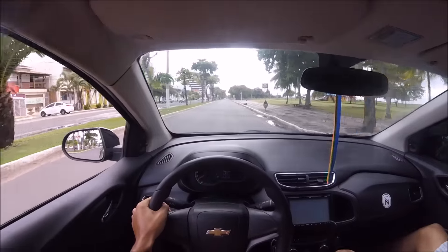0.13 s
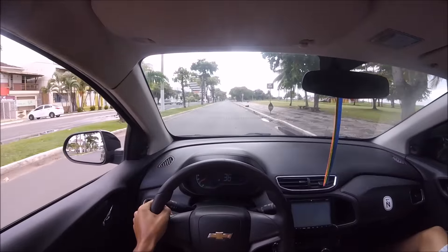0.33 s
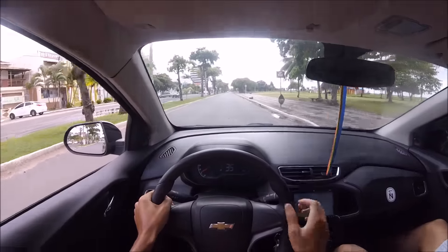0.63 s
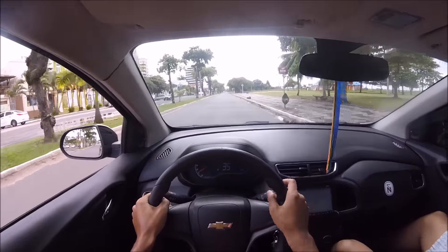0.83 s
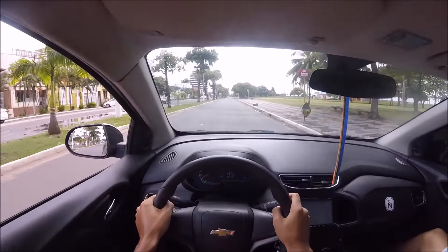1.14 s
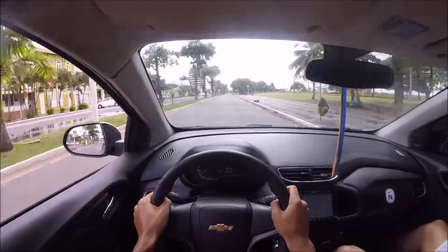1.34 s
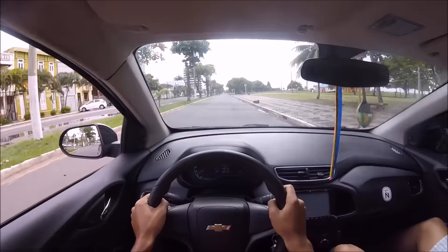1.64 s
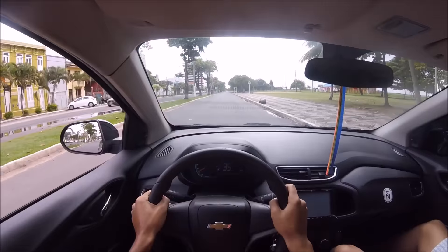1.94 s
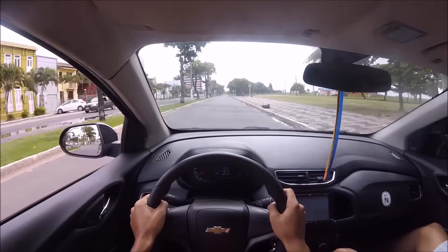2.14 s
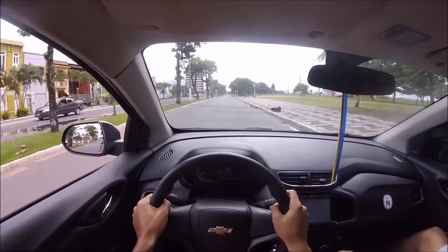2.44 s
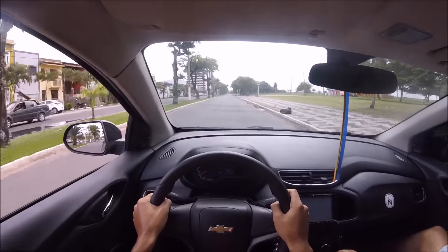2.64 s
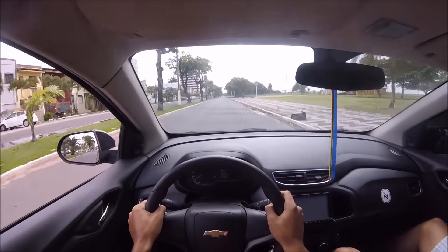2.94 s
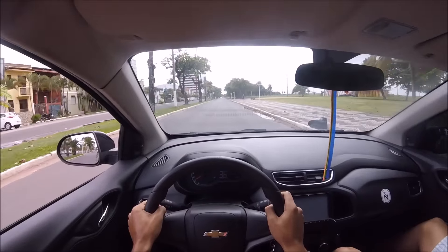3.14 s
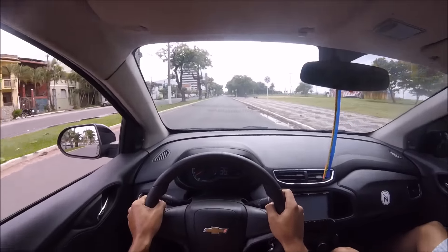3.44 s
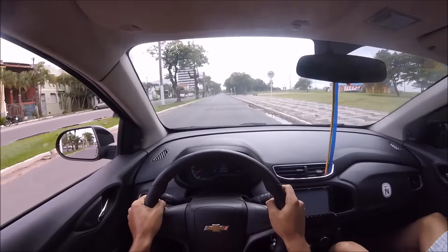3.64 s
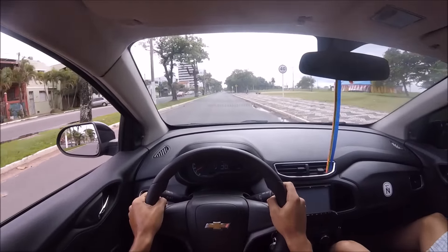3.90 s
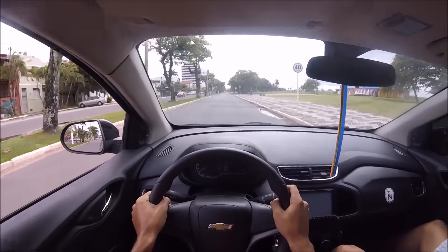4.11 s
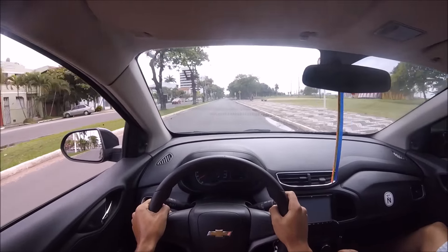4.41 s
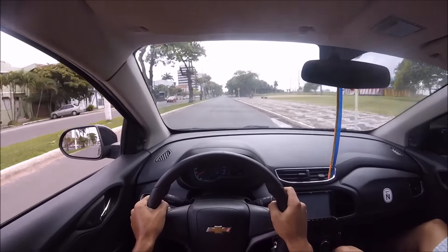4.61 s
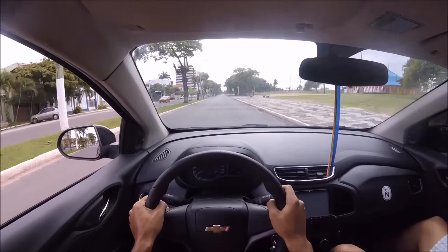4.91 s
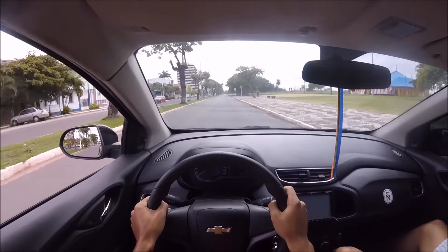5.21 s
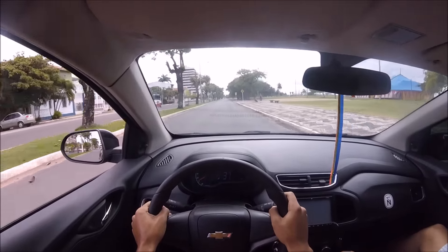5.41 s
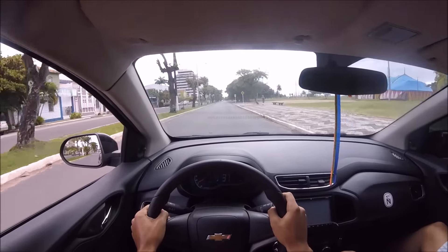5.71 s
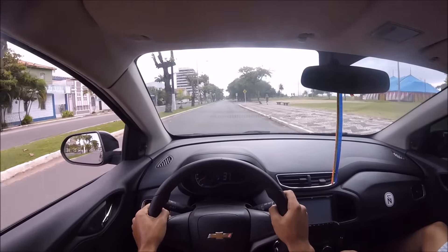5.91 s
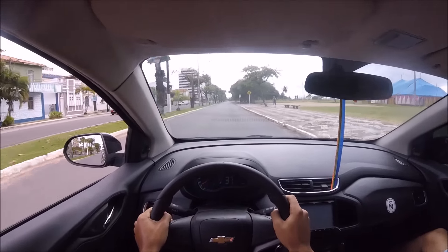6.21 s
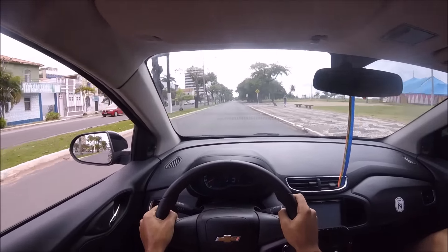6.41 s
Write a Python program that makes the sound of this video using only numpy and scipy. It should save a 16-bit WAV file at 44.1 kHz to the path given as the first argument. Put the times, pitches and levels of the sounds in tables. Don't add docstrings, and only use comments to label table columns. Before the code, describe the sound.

Steady car interior drive with heavy low air booms, faint engine hum and tyre and wind hiss, an oncoming vehicle swishing by, plastic ticks ending.

```python
import sys
import numpy as np
from scipy import signal
from scipy.fft import rfft, irfft, next_fast_len
from scipy.io import wavfile
from scipy.ndimage import uniform_filter1d, map_coordinates

SR = 44100
rng = np.random.default_rng(int(sys.argv[2]) if len(sys.argv) > 2 else 0)


def natural_amplitude(level_db):
    exponent = np.asarray(level_db, float) / 20
    return 10 ** exponent


def wav_out(sig):
    wavfile.write(sys.argv[1], SR, np.round(np.clip(np.atleast_2d(sig).T, -1, 1) * 32767).astype(np.int16))


N = 288855
TIME_S = np.arange(N) / SR


def unit(x):
    return x / np.sqrt(np.mean(x ** 2) + 1e-20)


def along(points, hz):
    f, v = np.transpose(points)
    return np.interp(np.log(hz + 1), np.log(f + 1), v)


def curves(rows):
    s, *cols = np.transpose(rows)
    return [np.interp(TIME_S, s, c) for c in cols]


def wobble(rate):
    knots = rng.standard_normal(int(N * rate / SR) + 4)
    return map_coordinates(knots, [np.arange(N) * rate / SR])


def noise(response):
    m = next_fast_len(N + SR // 2)
    spectrum = rfft(rng.standard_normal(m)) * response(np.fft.rfftfreq(m, 1 / SR))
    return unit(irfft(spectrum, m)[:N])


def coloured(spectrum):
    return noise(lambda hz: natural_amplitude(along(spectrum, hz)))


def resonant(modes, low_hz, high_hz):
    def response(hz):
        power = sum(natural_amplitude(2 * db) / (1 + (2 * (hz - centre) / width) ** 2) for centre, width, db in modes)
        skirts = (1 + (low_hz / (hz + 1)) ** 8) * (1 + (hz / high_hz) ** 8)
        return np.sqrt(power) / np.sqrt(skirts)
    return noise(response)


def steadied(x, share, span_s):
    swell = np.sqrt(np.abs(uniform_filter1d(x ** 2, int(span_s * SR))) + 1e-3)
    return unit(x / swell ** np.clip(share, 0, 1))


def tone(hz, start):
    return np.sqrt(2) * np.sin(2 * np.pi * (np.cumsum(hz) / SR + start))


def swells(rows, rest_db):
    t = np.arange(0, N + 64, 64) / SR
    power = natural_amplitude(2 * rest_db)
    for s, peak_db, length, *_ in rows:
        power = power + natural_amplitude(2 * peak_db - 24.2 * np.abs((t - s) / length) ** 2.4)
    return np.interp(TIME_S, t, np.sqrt(power))


def patchy(x, from_hz, depth_db):
    hz, _, z = signal.stft(x, SR, nperseg=256)
    field = uniform_filter1d(rng.standard_normal(z.shape), size=3, axis=0)
    field = uniform_filter1d(field, size=3, axis=1)
    reach = np.clip(hz[:, None] / from_hz - 1, 0, .2) * 5
    return unit(signal.istft(z * natural_amplitude(depth_db * reach * unit(field)), SR, nperseg=256)[1][:N])


# peak time in seconds, peak in dB, length in seconds,
# boom pitch in Hz.
SURGES = [(0.033, -18.9, 0.1, 28.2), (0.273, -18.5, 0.046, 29.03), (0.472, -15.5, 0.14, 28.36),
          (0.726, -15.5, 0.095, 28.2), (0.986, -23.5, 0.057, 27.92), (1.105, -13, 0.076, 28.8),
          (1.274, -12.5, 0.068, 28.54), (1.436, -12.5, 0.095, 27.37), (1.716, -13.5, 0.12, 27.33),
          (1.882, -14, 0.073, 29.02), (2.07, -17, 0.051, 27.12), (2.362, -17.5, 0.07, 27.9),
          (2.511, -17.5, 0.039, 27.6), (2.699, -23, 0.09, 28), (2.97, -24.5, 0.22, 28.8),
          (3.235, -16, 0.09, 28.29), (3.48, -18, 0.1, 26.55), (3.697, -19, 0.053, 27.43),
          (3.834, -13.5, 0.035, 29.5), (3.928, -14.8, 0.069, 28.37), (4.301, -11.5, 0.18, 27.67),
          (4.589, -12.5, 0.11, 27.85), (4.989, -13, 0.095, 27.66), (5.163, -14.0, 0.11, 28.44),
          (5.274, -12.5, 0.045, 27.87), (5.568, -12.5, 0.11, 28.0), (5.838, -17.1, 0.06, 27.2),
          (5.961, -17.5, 0.065, 28.76), (6.102, -20.5, 0.061, 29.7), (6.301, -12.5, 0.12, 28.7)]
# peak time in seconds, peak in dB, length in seconds.
DIPS = [(0.38, -27, 0.13), (0.76, -26, 0.13), (1.06, -18.5, 0.11), (1.23, -24.5, 0.056), (1.51, -19, 0.2),
        (2.03, -16, 0.22), (2.63, -25, 0.084), (2.96, -24.5, 0.14), (3.45, -22.5, 0.06), (3.59, -19, 0.17),
        (3.85, -23, 0.22), (4.32, -23.5, 0.096), (4.52, -19, 0.14), (4.78, -20.5, 0.11),
        (5.07, -26.5, 0.095), (5.37, -20, 0.16), (5.57, -26.5, 0.092), (5.88, -23, 0.09),
        (6.09, -21, 0.094), (6.27, -20, 0.097)]


def boom():
    hz, = curves([(s, pitch_hz) for s, *_, pitch_hz in SURGES])
    trough, waver_hz, bounce_hz = 3 / 4, 2.1, 19
    throb_gain = swells(SURGES, rest_db=-31.5) * natural_amplitude(1.9 * wobble(12))
    throb = throb_gain * tone(hz + .1 + waver_hz * wobble(17), trough)
    bounce_gain = swells(DIPS, rest_db=-37.5) * natural_amplitude(1.2 * wobble(7))
    return throb + bounce_gain * tone(bounce_hz + waver_hz * wobble(5), trough)


# centre in Hz, width in Hz, level in dB.
SUBFRAME = [(40.5, 9.5, 3), (50.7, 9.9, 1)]
FLOOR = [(65, 11, -1), (75.9, 15, -3), (86.5, 12, -6.5), (100.4, 6.1, -10.5)]
ROOF = [(114.3, 5, -7), (129.3, 4, 1), (148.5, 11, -5.5)]
PANELS = [(175.2, 16, 1.5), (204.3, 7.4, 2.5), (245, 32, -5.5), (288, 31, -6.5), (369.4, 33, -8)]
# peak time in seconds, peak in dB, length in seconds, frequency in Hz.
JOLTS = [(0.47, -29, 0.06, 43.2), (1.01, -39, 0.048, 125.5), (1.145, -20, 0.057, 41.3),
         (1.16, -29.5, 0.1, 69.7), (1.168, -39.5, 0.071, 224.9), (1.29, -25.5, 0.04, 80.0),
         (1.324, -39, 0.052, 121.8), (1.55, -22.5, 0.1, 44.8), (1.697, -23.5, 0.065, 40.5),
         (1.993, -31, 0.053, 82.0), (2.2, -34.5, 0.21, 130.0), (2.364, -23.8, 0.047, 47.0),
         (2.385, -33.5, 0.07, 72.1), (2.792, -33, 0.05, 129.9), (3.399, -32, 0.13, 79.3),
         (3.436, -36, 0.058, 218.6), (3.54, -23.5, 0.069, 47.2), (3.632, -38, 0.054, 239.0),
         (3.701, -35, 0.05, 125.7), (4.15, -21.5, 0.14, 45.4), (4.208, -36.5, 0.06, 222.2),
         (4.299, -30, 0.1, 78.8), (4.332, -25, 0.11, 48.8), (4.4, -37, 0.045, 129.3),
         (5.37, -33.5, 0.08, 132.0), (5.453, -23.8, 0.06, 42.3), (5.941, -38, 0.07, 129.7),
         (6.026, -20.5, 0.053, 43.8), (6.269, -25, 0.06, 45.0), (6.46, -18.5, 0.064, 41.8)]
# time in seconds, coarseness in dB.
SURFACE = [(0, -2), (.5, 0), (1, .5), (1.3, 0.5), (1.75, -3.5), (2.05, -1), (2.5, -2), (2.9, 2), (3.4, 0.5),
           (3.9, 2.5), (4.4, 1), (4.9, 0.7), (5.3, 1.5), (5.75, -1.5), (6.1, 0), (6.35, -3), (6.55, 7)]


def road():
    # modes, low and high skirt in Hz, steady level in dB, how strongly it follows the surface
    parts = [(SUBFRAME, 33, 57, -29, .9), (FLOOR, 62, 110, -37, 1.1),
             (ROOF, 104, 162, -37, .9), (PANELS, 160, 430, -41.5, .6)]
    coarse_db, = curves(SURFACE)
    nearest = np.searchsorted([59, 104, 165], [hz for *_, hz in JOLTS])
    out = 0
    for k, (modes, low_hz, high_hz, steady_db, follows) in enumerate(parts):
        shake = steadied(resonant(modes, low_hz, high_hz), share=.7, span_s=.07)
        jolts = swells([jolt for jolt, part in zip(JOLTS, nearest) if part == k], rest_db=-120)
        out = out + np.hypot(natural_amplitude(steady_db + follows * coarse_db), jolts) * shake
    return out


# multiple of the pulse rate, rms level in dB.
ORDERS = [(3, -47), (6, -55), (7, -54), (8, -59), (9, -58), (10, -60), (11, -59), (12, -61), (13, -65),
          (15, -65)]


def engine():
    pulse_hz = 29 * (1 + .005 * wobble(3))
    return sum(natural_amplitude(db + 3 * wobble(5)) * tone(order * pulse_hz, rng.random()) for order, db in ORDERS)


# frequency in Hz, level in dB per Hz.
TYRES = [(250, -33), (330, -4.5), (410, -6), (620, -10.5), (1000, -12), (1180, -13), (1400, -17.5),
         (1800, -31.5), (2400, -56.5)]
TREAD = [(1100, -27.5), (1600, 0.5), (2400, -6.5), (3300, -12), (4100, -13), (4800, -24.5), (6000, -50.5)]
WIND = [(3500, -29.5), (4800, -10), (5700, -9.5), (6100, -7), (6450, 1.5), (6800, -4), (7300, -6.5),
        (9200, -11.5), (10000, -21.5), (12000, -18), (13300, -22), (14000, -29.5), (14500, -48.5)]
# time in seconds, strength in dB.
AIR = [(0, -0.5), (.35, 0.2), (.7, 0.35), (1.15, 1.3), (1.5, -0.7), (1.85, 0.6), (2.1, -0.7), (2.7, -.6),
       (3.07, 1), (3.6, 0.9), (4.3, 0.5), (4.8, 0), (5.25, .5), (5.6, -0.5), (6, -0.6), (6.27, 0.9),
       (6.55, 1.6)]


def hiss():
    air_db, = curves(AIR)
    gust_db = .5 * wobble(4)
    tyres = natural_amplitude(-47 + 2 * air_db + gust_db + .47 * wobble(12)) * coloured(TYRES)
    tread = natural_amplitude(-57.5 + .9 * air_db + gust_db + .56 * wobble(13)) * coloured(TREAD)
    wind = patchy(coloured(WIND), from_hz=8000, depth_db=4.5)
    return tyres + tread + natural_amplitude(-65 + .9 * air_db + gust_db + .6 * wobble(10)) * wind


# start in seconds, step height in full scale,
# relaxation time in seconds.
CLICKS = [
    (1.389, .033, .004),
    (1.997, .075, .004),
    (4.1735, .012, .002),
    (4.1996, -.022, .0002),
    (4.205, -.042, .004),
    (5.517, .022, .002),
]


def clicks():
    steps = 0
    for s, height, relax in CLICKS:
        steps = steps + height * (TIME_S >= s) * np.exp(-np.maximum(TIME_S - s, 0) / relax)
    return uniform_filter1d(steps, size=3)


def passing_db(peak_db, coming_db, leaving_db):
    closing_m_per_s, abreast_s, gap_m = 22, 2.96, 5.2
    along_m = closing_m_per_s * (TIME_S - abreast_s)
    loss_db = np.where(along_m < 0, coming_db, leaving_db)
    return peak_db - loss_db * np.log2(np.hypot(along_m, gap_m) / gap_m)


# frequency in Hz, level in dB per Hz.
ROAR = [(350, -24.5), (520, 0), (650, -10.5), (850, -1.5), (1030, -4), (1300, -7), (1600, -16.5),
        (2200, -24.5), (3000, -33), (4000, -50.5)]
SWISH = [(1200, -24), (1800, -2.5), (2600, -1), (3700, -2), (4400, -8), (5300, -14), (6250, -7),
         (7100, -18.5), (9000, -38.5), (12000, -57.5)]


def oncoming():
    first, last = 2.1, 4.3
    near = np.interp(TIME_S, [first - .2, first + .5, last - .3, last + .26], [0, 1, 1, 0])
    roar_db = passing_db(peak_db=-40, coming_db=10, leaving_db=7)
    swish_db = passing_db(peak_db=-51, coming_db=6, leaving_db=6.6)
    roar = natural_amplitude(roar_db + .7 * wobble(15)) * coloured(ROAR)
    swish = natural_amplitude(swish_db + .7 * wobble(15)) * coloured(SWISH)
    return near * (roar + swish)


# start in seconds, body in dB, grit in dB, rise in seconds, length in seconds.
CREAKS = [
    (4.501, -74, -56.5, .02, 0.054),
    (5.504, -44.5, -69, .004, 0.017),
    (6.32, -69, -57, 0.0018, 0.0051),
    (6.4643, -46, -42, 0.00058, 0.0034),
    (6.4705, -41, -37, 0.0006, 0.0045),
    (6.481, -42, -44, 0.0008, 0.0077),
    (6.486, -46.5, -44, 0.0013, 0.009),
    (6.491, -55.5, -56, 0.0058, 0.032),
    (6.524, -62, -55, .002, 0.0065),
]
# frequency in Hz, level in dB per Hz.
BODY = [(350, -36.5), (700, -4.5), (1500, 0.5), (2500, -1.5), (3200, -3), (4000, -34)]
GRIT = [(2500, -24), (3400, -4.5), (4200, 1.5), (5200, -11), (6500, -5.5), (7200, -22), (11400, -30),
        (14000, -54)]


def trim():
    out = np.zeros(N)
    grains = natural_amplitude(2.5 * wobble(900))
    body, grit = unit(grains * coloured(BODY)), unit(grains * coloured(GRIT))
    for s, body_db, grit_db, rise, length in CREAKS:
        u = np.maximum(TIME_S - s, 0)
        shape = (1 - np.exp(-u / rise)) * np.exp(-(u / length) ** 2)
        out += shape * (natural_amplitude(body_db) * body + natural_amplitude(grit_db) * grit)
    return out


def knock():
    start_s, peak_db, hz, t60_s = 6.4645, -26, 290, .06
    u = np.maximum(TIME_S - start_s, 0)
    return -natural_amplitude(peak_db - 60 * u / t60_s) * np.sin(2 * np.pi * hz * u)


def scene():
    return (boom() + road() + engine() + hiss() + clicks() + oncoming() + trim() + knock())[None]


# time in seconds, edge of the loss in Hz,
# two surviving lines in Hz (0 for none).
STARVED = [(.073, 2300, 2900, 6500), (.478, 2600, 0, 6500), (.499, 2900, 0, 6500), (1.31, 2300, 0, 0),
           (1.651, 3000, 0, 0), (2.675, 2300, 0, 0), (2.739, 3500, 0, 0), (2.803, 3500, 0, 0),
           (2.953, 3500, 0, 6500), (2.995, 3800, 0, 6400), (3.337, 3000, 0, 6500), (3.827, 2200, 0, 6500),
           (4.147, 2500, 0, 6500), (4.19, 2000, 2900, 4100), (5.043, 3000, 0, 6500),
           (5.385, 2300, 6500, 13200), (5.449, 2000, 2800, 6500), (5.513, 2900, 3600, 0),
           (6.11, 3400, 0, 6600), (6.174, 3000, 0, 6600), (6.195, 1700, 2800, 9100), (6.281, 3200, 0, 0),
           (6.43, 2600, 0, 0)]
# frequency in Hz, step over the local level in dB.
COARSE = [(400, -40), (1000, -12), (2000, -4), (6500, 0), (8500, 1), (10000, 4), (12000, 2.5), (13500, 4),
          (14400, 12)]


def starve(x, thin_hz, scatter_db, starved_db, line_db):
    size, first_s = 941, .008
    n, k = np.arange(2 * size), np.arange(size) + .5
    window = np.sin(np.pi * (n + .5) / (2 * size))
    basis = window * np.cos(np.pi / size * np.outer(k, n + (size + 1) / 2)) * np.sqrt(2 / size)
    lead = 2 * size - round(first_s * SR)
    halves = np.pad(x, (lead, 3 * size - (N + lead) % size), "edge").reshape(-1, size)
    c = np.hstack([halves[:-1], halves[1:]]) @ basis.T
    hz = k * SR / (2 * size)
    local = 2 * np.exp(uniform_filter1d(np.log(np.abs(c) + 1e-9), size=24, axis=1))
    luck = np.repeat(rng.standard_normal((len(c), 30)), 32, axis=1)[:, :size]
    step = local * natural_amplitude(along(COARSE, hz) + scatter_db * luck)
    for s, *_ in CLICKS + CREAKS[3:]:
        row = int((s - first_s) * SR / size) + 1
        step[row:row + 2] *= natural_amplitude(-9)
    for s, edge_hz, *lines in STARVED:
        row = round((s - first_s) * SR / size) + 1
        step[row, hz > thin_hz] = natural_amplitude(starved_db) * local[row, hz > thin_hz]
        c[row, hz > edge_hz] = 0
        for line in [round(f / (2 * hz[0])) for f in lines if f]:
            c[row, line] = step[row, line] = natural_amplitude(line_db) * local[row, line]
    c = np.sign(c) * np.floor(np.abs(c) / step + .4) * step
    blocks = c @ basis
    return (blocks[:-1, size:] + blocks[1:, :size]).ravel()[lead - size:][:N]


def top_cut(x):
    return signal.sosfilt(signal.butter(12, 14440, fs=SR, output="sos"), x)


def record(dry):
    x = signal.sosfilt(signal.butter(2, 9, "high", fs=SR, output="sos"), dry[0])
    x = x / (1 + np.abs(x / .55) ** 8) ** (1 / 8)
    mix = starve(x, thin_hz=1000, scatter_db=2, starved_db=7.5, line_db=13)[None]
    return top_cut(mix)


dry = scene()
out = record(dry)
wav_out(out)
```